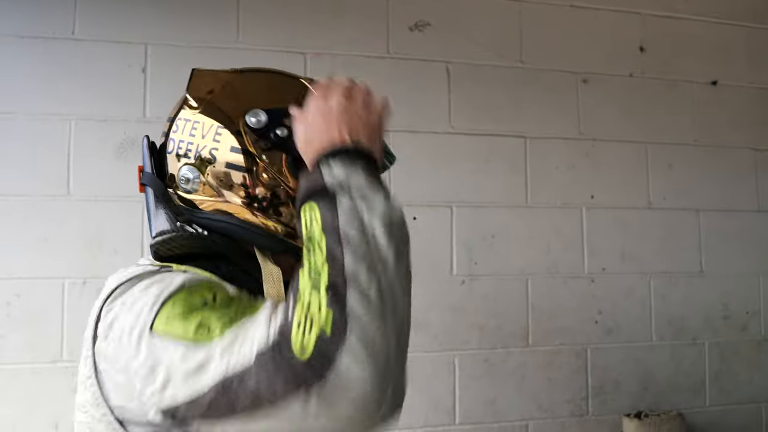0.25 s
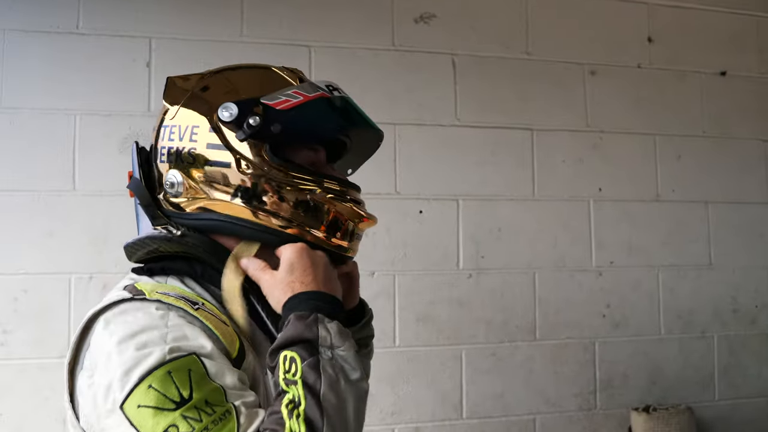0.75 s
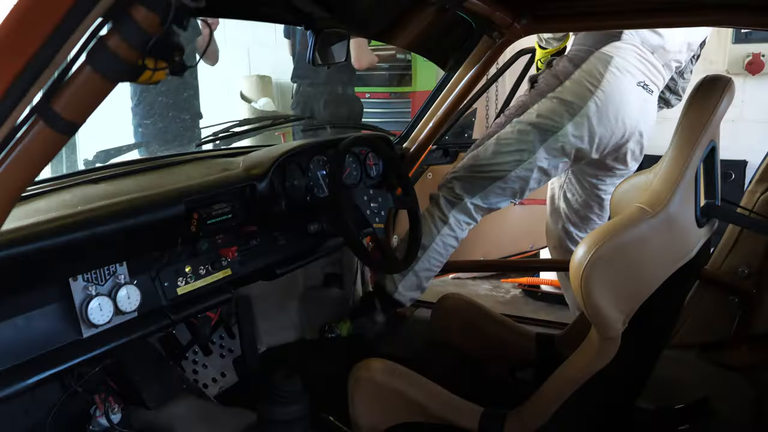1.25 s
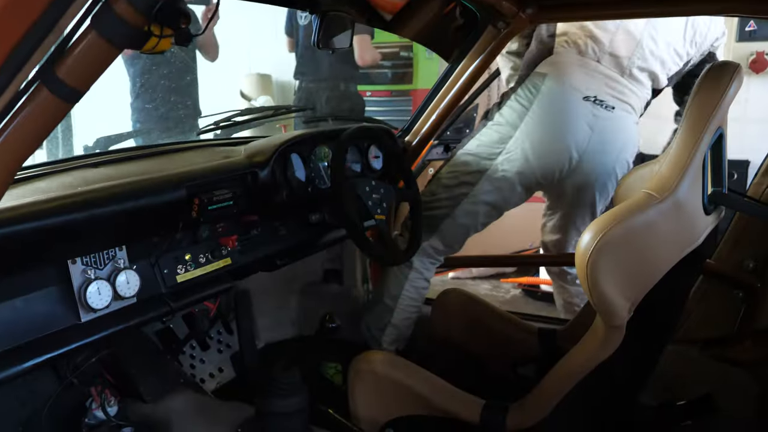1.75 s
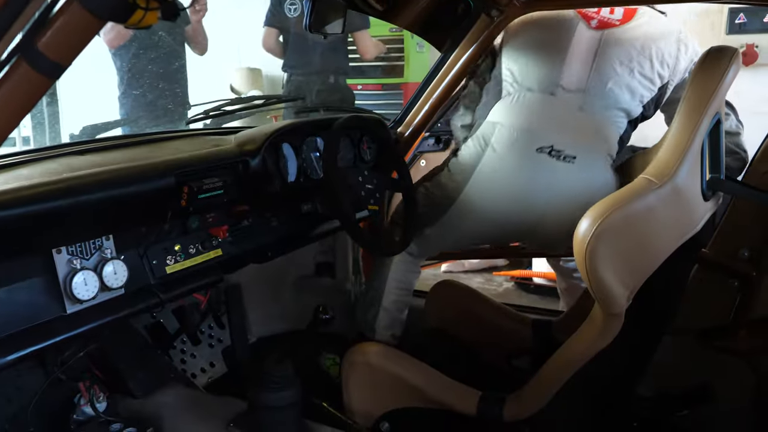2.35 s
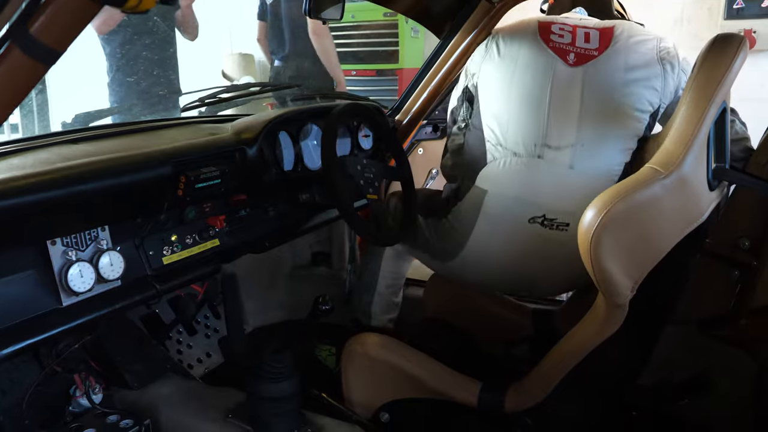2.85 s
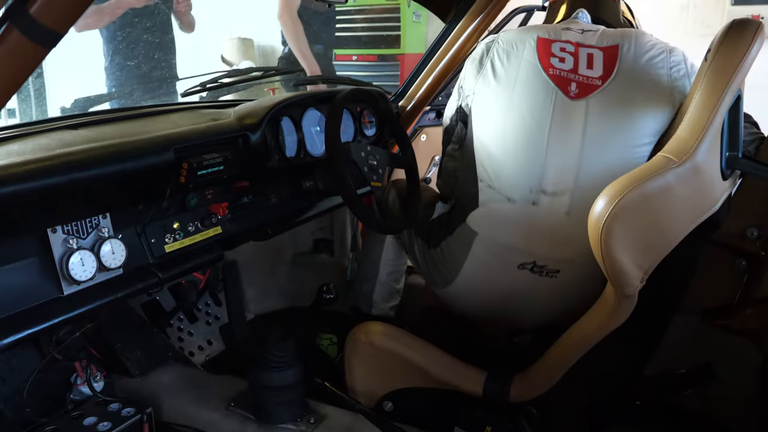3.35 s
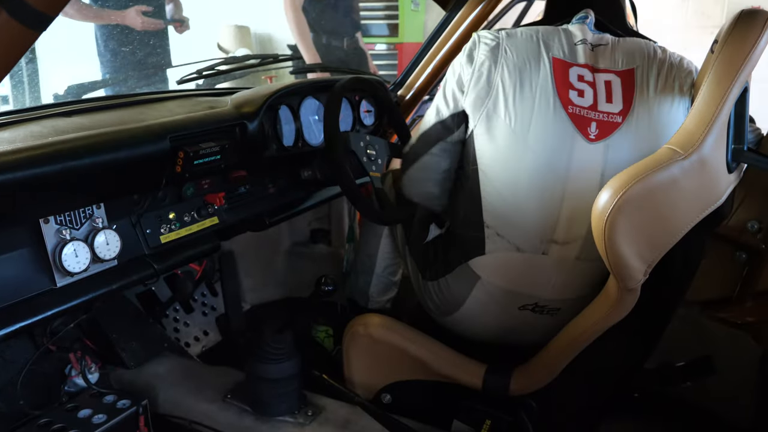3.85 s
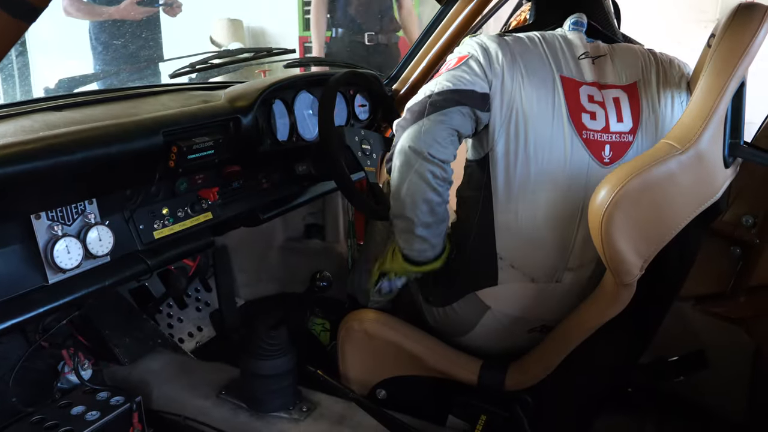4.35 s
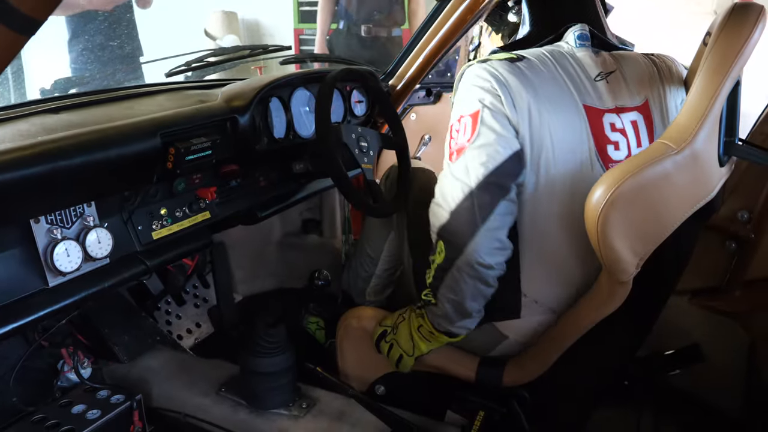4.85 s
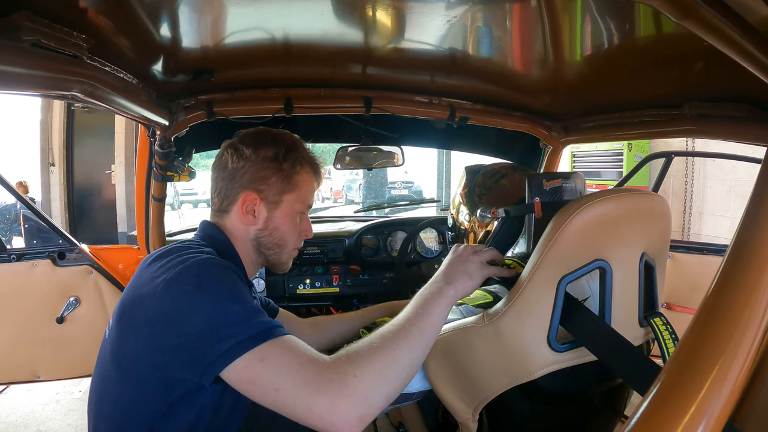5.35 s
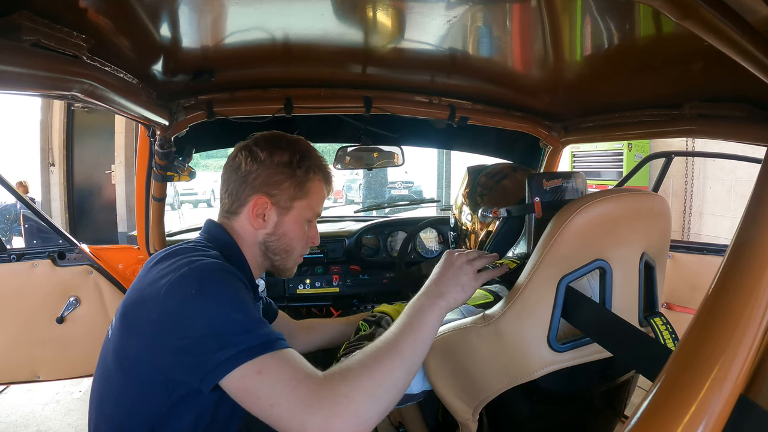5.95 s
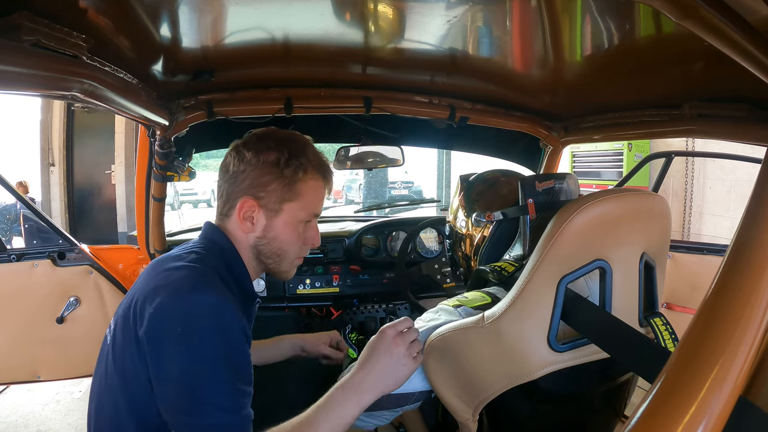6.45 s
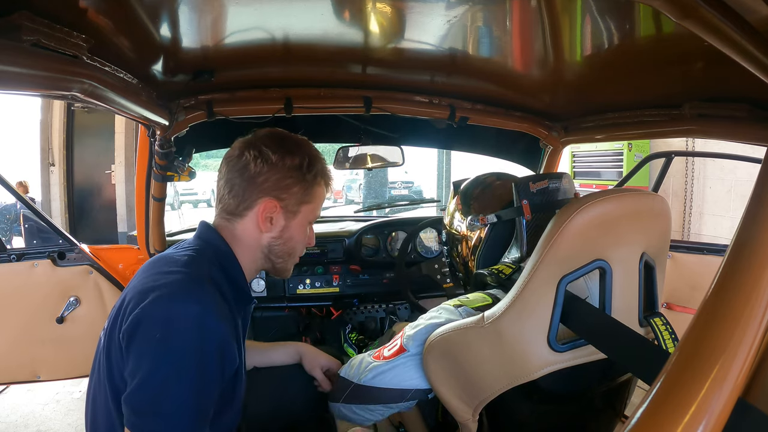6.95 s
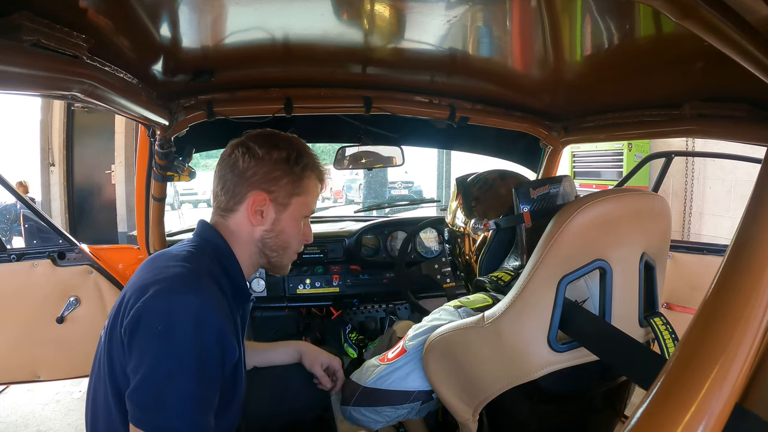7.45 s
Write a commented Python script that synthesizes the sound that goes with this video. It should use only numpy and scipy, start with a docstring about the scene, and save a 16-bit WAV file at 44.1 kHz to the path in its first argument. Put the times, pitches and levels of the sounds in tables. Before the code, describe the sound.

A six-cylinder race car engine idles in a garage for the whole seven and a half seconds or so: a low, loping drone with valve clatter and a faint fan whine, swelling and sagging slightly. For the first second it is heard from outside the car, with a few tiny, high ticks from a helmet buckle. At about 1 second the sound cuts to the cockpit by the open door, louder and fuller. The driver climbs in with soft suit scuffs, dull seat bumps and a small click between 1 and 2.5 seconds. A light knock comes at 4 seconds, then a loud, dry crack on the frame with a brief ring at 4.2, after which the level dips slightly. At 5 seconds the microphone moves behind the seats, where the idle is duller and boomier, stumbling a little, with faint seat bumps near 6.1 and 6.7 seconds.

```python
"""A droning, loping idle with valve clatter and fan whine: an air-cooled flat-six at 1200 rpm in a garage.
Six firings per engine cycle make the exhaust note and its uneven puffs; it swells and sags as speed hunts.
Heard from three spots in turn: by the wall, where a helmet buckle ticks; in the cockpit by the open door,
where the driver scuffs and knocks the car as he sits down; behind the seats, duller and boomier.
The hardest knock pushes the camera's gain down."""
import sys
import numpy as np
from scipy import signal
from scipy.fft import rfft, irfft, next_fast_len
from scipy.io import wavfile
from scipy.ndimage import uniform_filter1d, map_coordinates

SR = 44100
rng = np.random.default_rng(int(sys.argv[2]) if len(sys.argv) > 2 else 0)


def dump(signal):
    """Clip the signal to [-1, 1] and save it as 16-bit WAV at the path in sys.argv[1]."""
    limited = np.clip(np.atleast_2d(signal).T, -1, 1)
    pcm = np.round(limited * 32767).astype(np.int16)
    wavfile.write(sys.argv[1], SR, pcm)


N = 339129

IDLE_HZ, FIRINGS_PER_CYCLE = 59.8, 6
# Listening spots: wall, door, behind the seats. Each row: start and end in seconds.
SPOTS_S = [(0, 1.05), (1.05, 4.99), (4.99, 7.69)]

# Dry clicks. Each row: start in seconds, peak in dB.
DRY_CLICKS = [(1.05, -22.5), (1.596, -19), (4.984, -21.5)]
# Boot and suit scuffs; bumps on the padded seat. Each row: centre in seconds, level in dB,
# half length in seconds.
SUIT_SCUFFS = [(1.42, -40, 0.12), (2.292, -30.5, 0.087), (4.93, -41, 0.055)]
SEAT_BUMPS = [(1.15, -27.5, 0.043), (1.643, -24, 0.0081), (2.305, -35, 0.025), (6.115, -44, 0.027),
              (6.7, -42, 0.06)]
# Buckle ticks. Each row: start in seconds, ring gain in dB, snap level in dB.
BUCKLE_TICKS = [(.24, -60, -74), (.497, -48.5, -62), (.786, -66, -56), (.792, -57, -49.5),
                (1.425, -68, -59.5), (1.437, -62, -50), (4.028, -60, -36)]
# Blows on seat and door frame. Each row: start in seconds, crack level in dB, relative ring gain in dB,
# crack t60 in seconds.
FRAME_KNOCKS = [(4.028, -27, -40, 0.11), (4.039, -37, -47, 0.069), (4.1943, -35.5, -14, 0.15),
                (4.2039, -2, 1.5, 0.03), (4.212, -16, -23, 0.11)]
# Modes of buckle and frame. Each row: frequency in Hz, relative level in dB, t60 in seconds.
BUCKLE_MODES = [(10200, -3, .04), (12500, -6, .04), (13300, -3, .045), (13550, -2, .04)]
FRAME_MODES = [(160.4, -5, 0.28), (264, 5, 0.046), (497, -7.5, 0.11), (595, 4, 0.054), (844, -8, 0.09),
               (1015, -11, 0.13), (1330, -3.5, 0.028), (1584, -1.5, 0.037), (1694, -10, 0.064),
               (2070, -13.5, 0.032), (2670, -15, 0.067), (4100, -17.5, 0.074), (5300, -22.5, .05)]
# Noise of scuff, bump, buckle snap and knock crack. Each row: frequency in Hz, relative density in dB.
CLOTH_SPECTRUM = [(100, -33), (400, 6.5), (1000, -1.5), (2500, -13), (5000, -18), (11000, -35),
                  (16000, -53)]
PADDING_SPECTRUM = [(120, -16), (350, 5), (850, -3.5), (1250, -2), (1800, -8), (2600, -23), (16000, -80)]
SNAP_SPECTRUM = [(3000, -30), (9000, -9), (11000, 2), (14000, -5), (15000, -12)]
CRACK_SPECTRUM = [(200, -8), (590, 2.5), (760, -4.5), (1150, -7.5), (1650, -0.5), (2300, -2.5), (2750, -5),
                  (3250, -11.5), (4300, -2), (5250, -3), (6000, -11.5), (7500, -14.5), (9900, -16.5),
                  (11300, -21), (16000, -33)]

# Hoots as the idle picks up. Each row: centre in seconds, pitch in Hz, level in dB, half length in seconds.
IDLE_HOOTS = [(.36, 566, -37.5, 0.082), (5.22, 583, -33.5, 0.034), (6.112, 580, -39, 0.033),
              (6.703, 580, -40.5, 0.044)]
# Hunting idle. Each row: time in seconds, firing rate in Hz.
FIRING_RATE = [(0, 59.3), (.38, 60.5), (.55, 59.6), (.74, 60.4), (.93, 59.2), (1.2, 59.8), (2.35, 59.8),
               (2.66, 59.0), (2.87, 60.6), (3.22, 59.3), (3.42, 60.2), (3.8, 59.5), (4.2, 59.7),
               (4.9, 59.8), (5.24, 61.0), (5.9, 58.3), (6.13, 60.6), (6.5, 60.0), (6.74, 60.8), (6.9, 59.6),
               (7.69, 60.0)]
# Lines from unequal cylinders, gears and belt. Each row: multiple of the cycle rate, then dB at each spot.
ENGINE_ORDERS = [(3, -57, -44.5, -31.5), (5, -50, -57, -47), (7.03, -51.5, -41, -39),
                 (7.88, -61.5, -44, -44), (8.98, -46.5, -36, -38.5), (9.76, -46, -39, -45.5),
                 (11.06, -49, -46, -40), (14.96, -40, -35.5, -42.5), (15.93, -41, -34.5, -41.5),
                 (18.89, -45, -37, -42), (24.8, -45, -42, -43.5), (27.43, -51.5, -41.5, -47.5),
                 (32, -55, -47, -50), (36.34, -60, -45.5, -57.5), (55.8, -47, -43.5, -61.5),
                 (70.8, -55, -50, -65.5), (74.9, -54, -66, -49.5), (107.5, -49, -50, -60.5),
                 (153.3, -62, -50.5, -68)]
# Engine bay and exhaust noise, one table per spot. Each row: frequency in Hz, relative density in dB.
BAY_SPECTRA = [
    [(190, -50.5), (320, -31), (360, -6), (422, -2.5), (505, -7), (557, -5), (796, -12.5), (1050, -9),
     (1500, -11), (3280, -26), (5440, -28.5), (12700, -48.5), (13800, -51), (15700, -57)],
    [(190, -29), (320, -6.5), (365, 1.5), (398, -5.5), (440, -0.5), (557, -4), (784, -9.5), (1100, -8.5),
     (1300, -8.5), (1530, -11), (2450, -19), (3680, -26.5), (5440, -27), (7000, -32.5), (15700, -50.5)],
    [(190, -33), (320, -5), (377, -5), (402, -9.5), (489, -8.5), (513, -16), (570, -7), (644, -10.5),
     (748, -9.5), (836, -13.5), (1160, -10.5), (1260, -18.5), (4850, -37.5), (8300, -48.5), (12500, -64),
     (15700, -67.5)],
]
RUMBLE_SPECTRA = [
    [(20, -21), (45, -11), (90, -3), (150, 3), (210, 1.5), (330, -4), (600, -34), (2500, -120)],
    [(20, -20), (45, -3), (90, 1), (150, -1.5), (210, -0.5), (280, -3.5), (600, -32), (2500, -120)],
    [(15, -5.5), (29, 10), (45, 6), (90, 1), (170, 1), (220, -4), (330, -10.5), (600, -30.5), (2500, -120)],
]
# Bay peaks and dips, one table per spot. Each row: centre in Hz, width in Hz, gain in dB.
BAY_RESONANCES = [
    [(565, 31, 3), (1200, 66, 3), (1470, 150, 3.5), (4970, 630, 2.5)],
    [(540, 23, -3.5), (740, 22, 2), (1134, 61, 3), (1550, 230, 4.5), (4950, 1100, 3.5)],
    [(322, 11, 2), (760, 40, 0), (990, 44, 4), (1080, 64, -1), (1416, 180, 5)],
]
# The driver fills the doorway and shields the bay. Each row: time in seconds, clatter gain in dB.
DOORWAY_GAIN = [(1.05, 3), (1.29, 3), (1.44, 2.5), (1.55, 1.5), (1.74, 0), (3.0, -1.23), (3.9, -2),
                (4.99, -2.5)]
# Base mix per spot. Each row: rumble, clatter, fan and third harmonic in dB,
# then growth of clatter and fan in dB per Hz of firing rate.
SPOT_MIX = [(-36, -32.5, -58, -29, 0.4), (-29, -29.5, -42.5, -37, 0), (-29, -36.5, -51.5, -39.5, 0.6)]
# Exhaust note per spot. Each row: firing tone base level in dB, its slope in dB per Hz of firing rate,
# then the same two for the octave.
SPOT_NOTE = [(-39, -5, -18.5, 6), (-22.5, -3.5, -20.5, -2.5), (-21.5, 0, -19.5, -0.1)]
# One off-beat cylinder, per spot. Each row: place in the cycle 0-1, octave slip in radians,
# gap depth 0-1, build-up in dB.
SPOT_LIMP = [(0.29, 0.58, 0.04, 3), (.22, 2, 0.84, 6), (.42, 1.35, 0.24, -1.5)]
# The firing tone sags as the idle stumbles. Each row: centre in seconds, depth in dB.
IDLE_STUMBLES = [(2.88, 7), (3.12, 1), (3.38, 7), (4.11, 6), (5.25, 8), (5.41, 11), (6.15, 8), (6.36, 5),
                 (6.775, 13), (7.4, 2), (7.6, 9)]
# Cabin boom shifts as people move. Each row: time in seconds, firing tone gain in dB, octave gain in dB.
CABIN_BOOM = [(1.0, 7, -3), (1.06, -9, 0), (1.2, -2, 4.5), (1.29, -3, 7), (1.44, 4, -4.5), (1.55, 2.5, 9.5),
              (1.68, 1.5, 0), (2.0, -1, 0.5), (2.55, 1, 1.5), (2.7, 0.5, 3), (2.87, -5, -2.5),
              (3.0, -2, -0.5), (3.25, 1.5, 1), (3.45, 1, -0.5), (3.6, -0.5, 2), (4.0, 0, 0.5),
              (4.3, -1.5, -0.5), (4.99, -2.5, 0), (5.35, 2.5, 0), (5.52, 0.5, 1), (6.05, 3, -3.5),
              (6.16, -5.5, 1.5), (6.7, 0.5, -0.5), (7.0, -0.5, 1), (7.69, 0, .5)]


def amp(db):
    """Decibels to gain."""
    return 10 ** (np.asarray(db) / 20)


def unit(x):
    """x at rms 1."""
    return x / np.sqrt(np.mean(x ** 2) + 1e-20)


def curves(rows):
    """One value per sample for each column after the time."""
    times_s, *columns = np.transpose(rows)
    return [np.interp(np.arange(N) / SR, times_s, column) for column in columns]


def wobble(rate_hz):
    """Smooth random curve, rate_hz knots a second."""
    knots = rng.standard_normal(int(N * rate_hz / SR) + 4)
    return map_coordinates(knots, [np.arange(N) * rate_hz / SR])


def swell(centre_s, half_s):
    """Bell-shaped envelope."""
    return np.exp(-((np.arange(N) / SR - centre_s) / half_s) ** 2)


def coloured(x, spectrum, resonances=()):
    """x through a spectrum with resonant peaks and dips, at rms 1."""
    size = next_fast_len(len(x) + 8192)
    hz = np.fft.rfftfreq(size, 1 / SR)
    knots_hz, knots_db = np.transpose(spectrum)
    db = np.interp(np.log(hz + 1), np.log(knots_hz), knots_db)
    for centre_hz, width_hz, gain_db in resonances:
        db += gain_db / (1 + (2 * (hz - centre_hz) / width_hz) ** 2)
    return unit(irfft(rfft(x, size) * amp(db), size)[:len(x)])


def reverberant(x, t60_s):
    """Diffuse hard-wall reflections, redrawn every 0.2 s so that no steady pitch rings out; rms 1."""
    t, step = np.arange(SR // 4) / SR, SR // 5
    out = np.zeros(N + SR)
    for start in range(0, N, step):
        tail = unit(rng.standard_normal(len(t)) * amp(-60 * t / t60_s))
        echo = signal.fftconvolve(x[start:start + step], tail)
        out[start:start + len(echo)] += echo
    return unit(out[:N])


def strokes(cycle, count, pattern_db, scatter_db, jitter_s):
    """count impulses per engine cycle: a fixed uneven pattern plus fresh scatter."""
    index = np.arange(int(cycle[-1] * count))
    slot = index % count
    slot_size, slot_place = rng.standard_normal(count), rng.random(count)
    time_error, size_error = rng.standard_normal((count * 100, 2))[index].T
    due = np.interp((index + slot_place[slot]) / count, cycle, np.arange(N))
    at = np.clip(due + jitter_s * SR * time_error, 0, N - 1).astype(int)
    sizes = amp(pattern_db * slot_size[slot] + scatter_db * size_error)
    return unit(np.bincount(at, sizes, N))


def strike(out, start_s, spectrum, noise_db, noise_t60_s, modes, ring_db, attack_s=0.00017):
    """Add one impact to out: a noise burst plus damped modes, each scattered by 1 dB."""
    t = np.arange(SR // 3) / SR
    burst = amp(noise_db - 60 * t / noise_t60_s) * coloured(rng.standard_normal(len(t)), spectrum)
    ring = sum(amp(db + rng.standard_normal() - 60 * t / t60_s) * np.sin(2 * np.pi * hz * t)
               for hz, db, t60_s in modes)
    rise = 1 - np.exp(-t / attack_s)
    out[round(start_s * SR):][:len(t)] += rise * (burst + amp(ring_db) * ring)


def clicks(t60_s=0.0005):
    """Bare clicks, no ring."""
    out, t = np.zeros(N), np.arange(SR // 100) / SR
    for start_s, db in DRY_CLICKS:
        out[round(start_s * SR):][:len(t)] += amp(db - 60 * t / t60_s)
    return out


def rustle(grain_db=1.0):
    """The racing suit catches and slips; seat padding gives with dull bumps."""
    out = np.zeros(N)
    for events, spectrum in ((SUIT_SCUFFS, CLOTH_SPECTRUM), (SEAT_BUMPS, PADDING_SPECTRUM)):
        pressure = sum(amp(db) * swell(centre_s, half_s) for centre_s, db, half_s in events)
        friction = rng.standard_normal(N) * amp(grain_db * wobble(120))
        out += pressure * coloured(friction, spectrum)
    return out


def buckle(snap_t60_s=0.036):
    """A steel buckle snaps and rings high."""
    out = np.zeros(N)
    for start_s, ring_db, snap_db in BUCKLE_TICKS:
        strike(out, start_s, SNAP_SPECTRUM, snap_db, snap_t60_s, BUCKLE_MODES, ring_db)
    return out


def knocks(ring_trim_db=-6.5):
    """The driver hits seat and door frame: a dry crack, then the frame rings."""
    out = np.zeros(N)
    for start_s, crack_db, ring_db, t60_s in FRAME_KNOCKS:
        strike(out, start_s, CRACK_SPECTRUM, crack_db, t60_s, FRAME_MODES, ring_db + ring_trim_db)
    return out


def hoots(waver_rad=0.45):
    """A narrow resonance, likely in the intake, swells and fades."""
    t = np.arange(N) / SR
    drift_rad = waver_rad * wobble(45)
    return np.sqrt(2) * sum(amp(db) * swell(centre_s, half_s) * np.cos(2 * np.pi * hz * t + drift_rad)
                            for centre_s, hz, db, half_s in IDLE_HOOTS)


def fan(cycle, blade_order=113.5, waver_rad=0.89, flutter_db=2.5):
    """Belt-driven cooling fan: blade whine, roughened by the chopped air."""
    phase = 2 * np.pi * blade_order * cycle + waver_rad * wobble(45)
    return unit(np.cos(phase) * amp(flutter_db * wobble(16)))


def order_lines(cycle, unsteadiness=0.28, wander_cycles=0.0026):
    """Unequal cylinders and turning parts: lines that waver more the higher they lie; a row per spot."""
    out = np.zeros((len(SPOTS_S), N))
    for order, *levels_db in ENGINE_ORDERS:
        phase = 2 * np.pi * (order * (cycle + wander_cycles * wobble(22)) + rng.random())
        sidebands = wobble(9) * np.cos(phase) + wobble(9.8) * np.sin(phase)
        out += amp(levels_db)[:, None] * unit(np.cos(phase) + unsteadiness * sidebands)
    return out


def clatter(cycle, air_gain=1.26, throb_depth=0.078, direct_gain=0.54):
    """Twelve valves open and shut each cycle, over cooling air that pulses with the firings."""
    taps = strokes(cycle, count=24, pattern_db=2.5, scatter_db=1.5, jitter_s=0.0004)
    valves = reverberant(taps, t60_s=0.25) + direct_gain * taps
    throb = 1 + throb_depth * np.cos(2 * np.pi * FIRINGS_PER_CYCLE * cycle)
    return valves + air_gain * rng.standard_normal(N) * throb


def rumble(cycle, turbulence_gain=0.89):
    """Each firing puffs a little differently out of the pipe."""
    puffs = strokes(cycle, count=FIRINGS_PER_CYCLE, pattern_db=0, scatter_db=0.5, jitter_s=0.0039)
    return reverberant(puffs - puffs.mean(), t60_s=0.038) + turbulence_gain * rng.standard_normal(N)


def limp(cycle, place, slip_rad, depth, build_db, gap_s=0.028):
    """Complex gain of the octave: it runs sharp until an off-beat cylinder dips it and knocks it back."""
    since = (cycle - place) % 1
    distance_s = np.minimum(since, 1 - since) * FIRINGS_PER_CYCLE / IDLE_HZ
    gap = np.exp(-(distance_s / (gap_s / 2)) ** 2)
    ramp = since - 0.5
    ahead = uniform_filter1d(amp(build_db * ramp) * np.exp(1j * slip_rad * ramp), size=512)
    return uniform_filter1d(ahead, size=256) * (1 - depth * gap)


def drone(cycle, firing_db, octave_db, third_db, limp_gain, flutter_db=0.98, octave_phase_rad=0.88):
    """Exhaust note: firing tone, limping octave and third harmonic."""
    phase = 2 * np.pi * FIRINGS_PER_CYCLE * cycle
    octave = np.real(limp_gain * np.exp(1j * (2 * phase + octave_phase_rad)))
    partials = (firing_db, np.cos(phase)), (octave_db, octave), (third_db, np.cos(3 * phase))
    return np.sqrt(2) * sum(amp(db + flutter_db * wobble(22)) * wave for db, wave in partials)


def engine(shield_share=0.51, stumble_half_s=0.042):
    """One hunting idle drives all engine layers; each spot in turn colours them."""
    firing_hz, = curves(FIRING_RATE)
    surge_hz = firing_hz - IDLE_HZ
    cycle = np.cumsum(firing_hz) / SR / FIRINGS_PER_CYCLE
    lines, puffs, valves, whine = order_lines(cycle), rumble(cycle), clatter(cycle), fan(cycle)
    sag_db = sum(depth_db * swell(centre_s, stumble_half_s) for centre_s, depth_db in IDLE_STUMBLES)
    boom_db, octave_boom_db = curves(CABIN_BOOM)
    t, out = np.arange(N) / SR, np.zeros(N)
    for spot, (start_s, end_s) in enumerate(SPOTS_S):
        rumble_db, clatter_db, fan_db, third_db, effort_db_per_hz = SPOT_MIX[spot]
        firing_db, firing_db_per_hz, octave_db, octave_db_per_hz = SPOT_NOTE[spot]
        firing_db += firing_db_per_hz * surge_hz + boom_db - sag_db
        octave_db += octave_db_per_hz * surge_hz + octave_boom_db
        note = drone(cycle, firing_db, octave_db, third_db, limp(cycle, *SPOT_LIMP[spot]))
        effort_db = effort_db_per_hz * surge_hz
        doorway_db = curves(DOORWAY_GAIN)[0] if spot == 1 else 0
        exhaust = amp(rumble_db) * coloured(puffs, RUMBLE_SPECTRA[spot])
        body = lines[spot] + exhaust + amp(fan_db + effort_db) * whine
        body *= amp(shield_share * doorway_db)  # shielded less than the clatter
        bay = coloured(valves, BAY_SPECTRA[spot], BAY_RESONANCES[spot])
        bay *= amp(clatter_db + doorway_db + effort_db)
        here = (t >= start_s) & (t < end_s)
        out += uniform_filter1d(here.astype(float), size=128) * (note + body + bay)
    return out


def gain_control(x, limit_db=-6, recover_db_per_s=2):
    """Camera gain: drops at once on a loud blow, creeps back."""
    level_db = 10 * np.log10(np.abs(uniform_filter1d(x ** 2, size=256)) + 1e-12)
    excess_db = np.maximum(level_db - limit_db, 0)
    recovered_db = recover_db_per_s * np.arange(x.shape[-1]) / SR
    cut_db = np.maximum.accumulate(excess_db + recovered_db, axis=-1) - recovered_db
    return amp(-cut_db)


def scene():
    """The idling car and the driver getting ready, mono."""
    return (engine() + hoots() + knocks() + buckle() + rustle() + clicks())[None]


def record(dry):
    """Camera: gain control reset at each spot, soft clipping, band limit."""
    ceiling, top_hz = 0.8, 15750
    spans = np.split(dry, [round(start_s * SR) for start_s, _ in SPOTS_S[1:]], axis=-1)
    gain = np.concatenate([gain_control(span) for span in spans], axis=-1)
    levelled = dry * uniform_filter1d(gain, size=64)
    clipped = levelled / (1 + np.abs(levelled / ceiling) ** 8) ** (1 / 8)
    size = next_fast_len(N + SR // 2)
    passband = np.fft.rfftfreq(size, 1 / SR) < top_hz
    return irfft(rfft(clipped, size) * passband, size)[..., :N]


dry = scene()
out = record(dry)
dump(out)
```